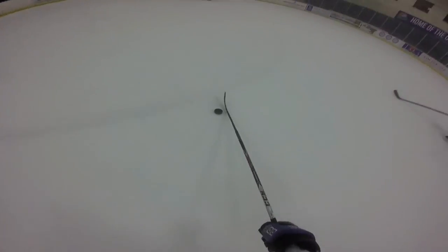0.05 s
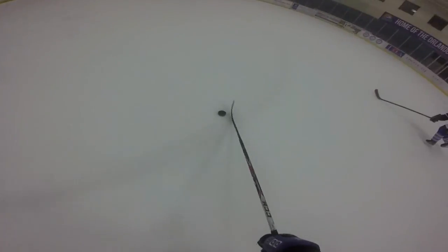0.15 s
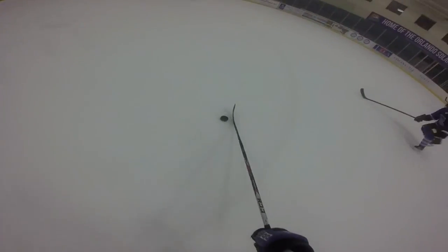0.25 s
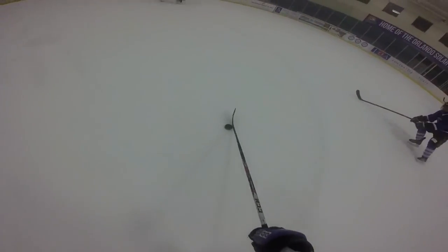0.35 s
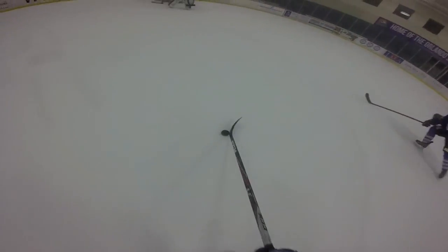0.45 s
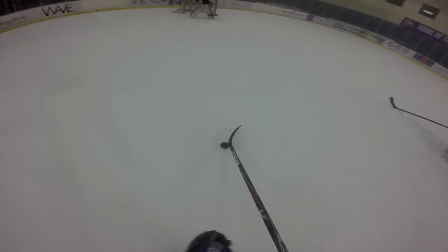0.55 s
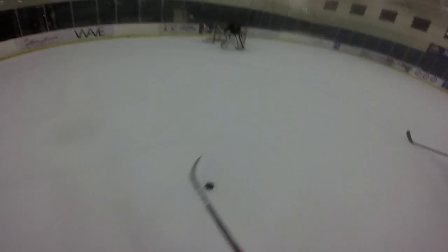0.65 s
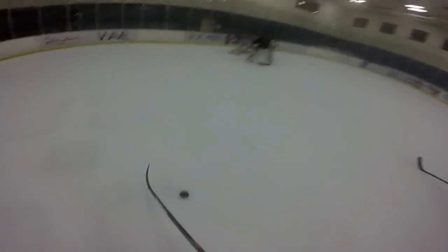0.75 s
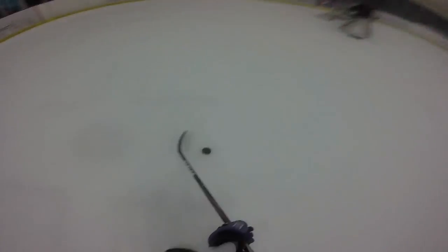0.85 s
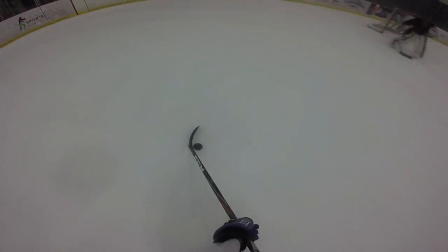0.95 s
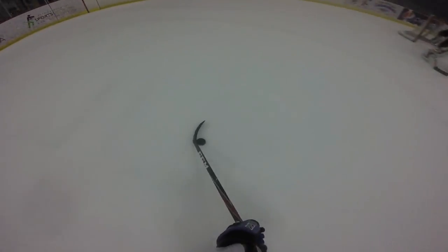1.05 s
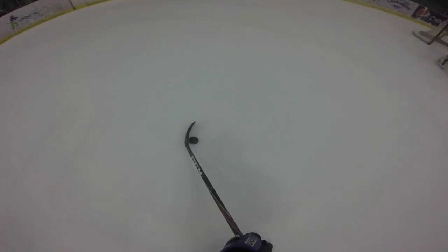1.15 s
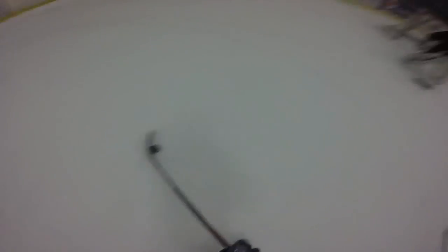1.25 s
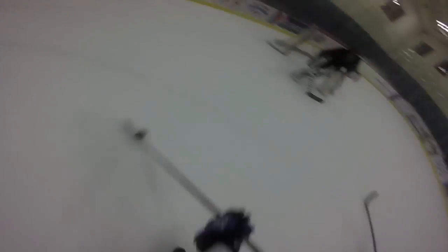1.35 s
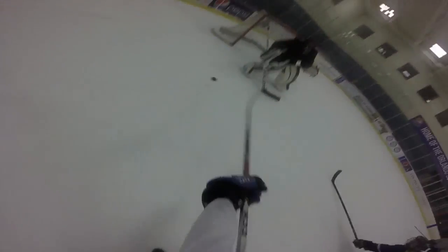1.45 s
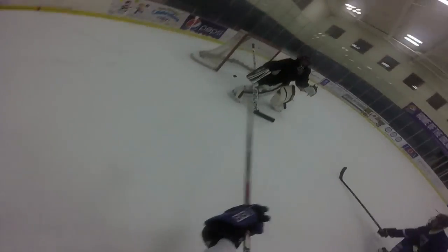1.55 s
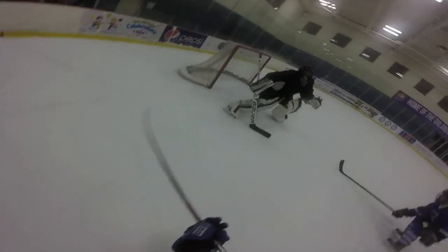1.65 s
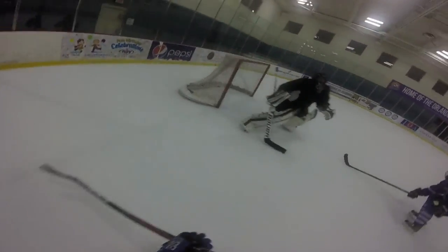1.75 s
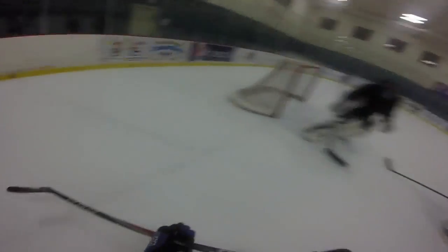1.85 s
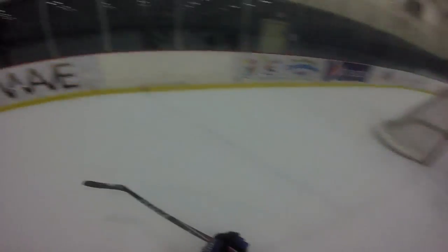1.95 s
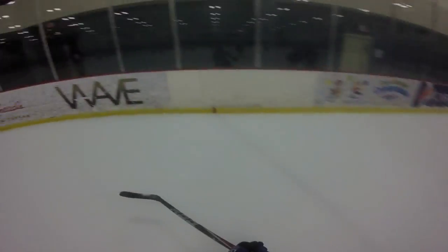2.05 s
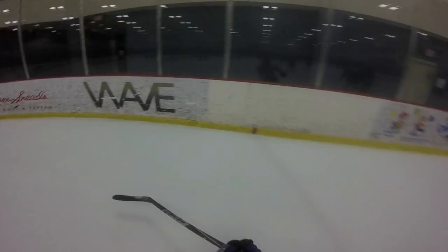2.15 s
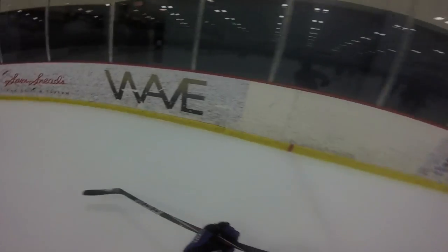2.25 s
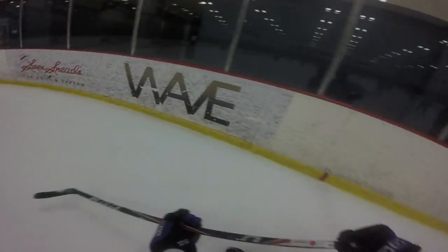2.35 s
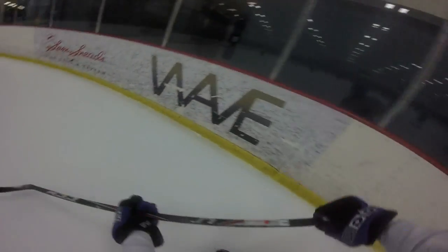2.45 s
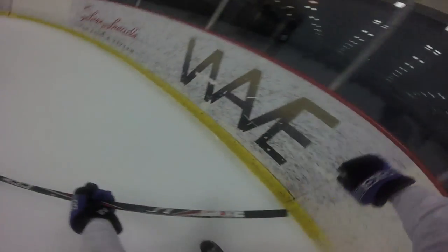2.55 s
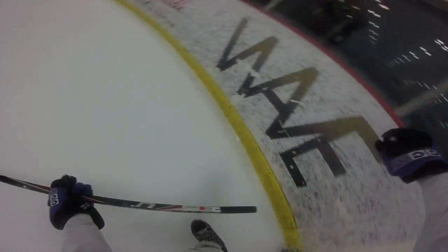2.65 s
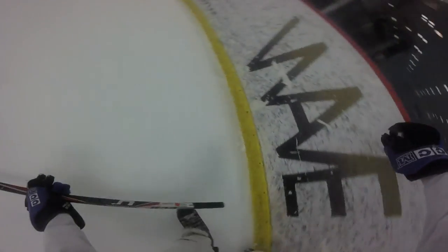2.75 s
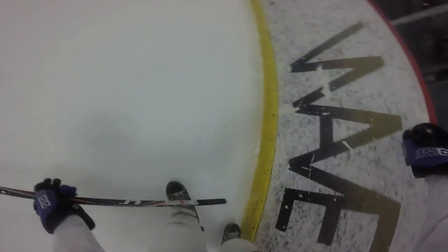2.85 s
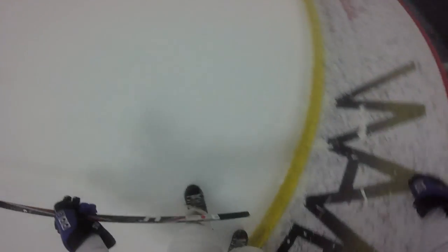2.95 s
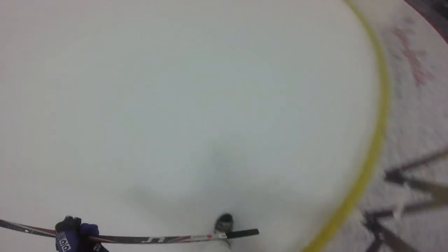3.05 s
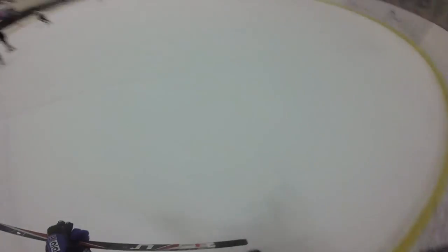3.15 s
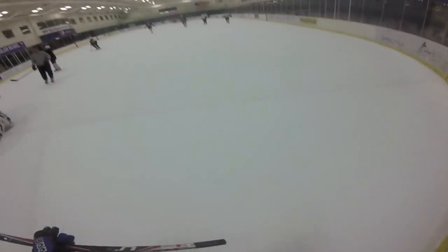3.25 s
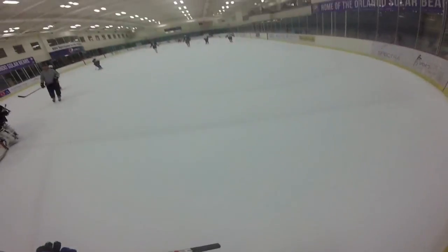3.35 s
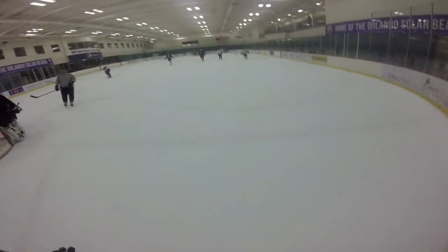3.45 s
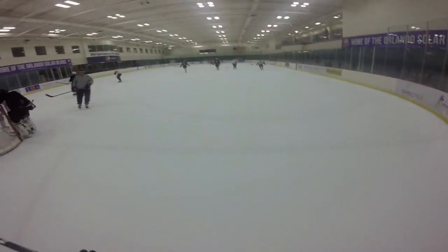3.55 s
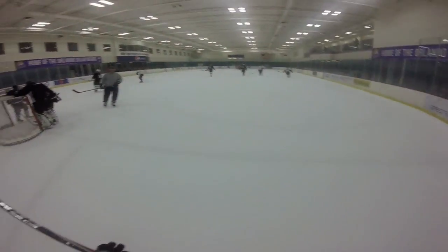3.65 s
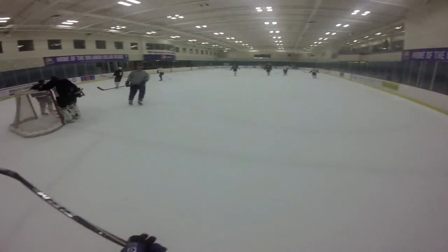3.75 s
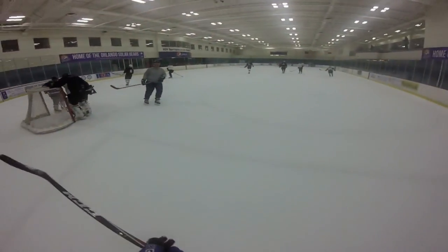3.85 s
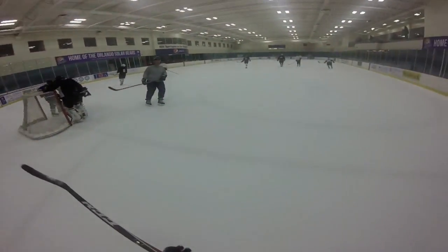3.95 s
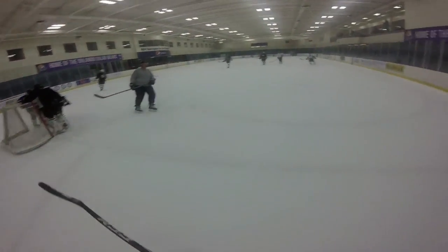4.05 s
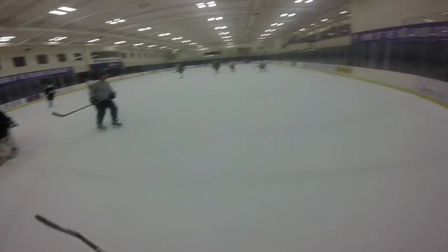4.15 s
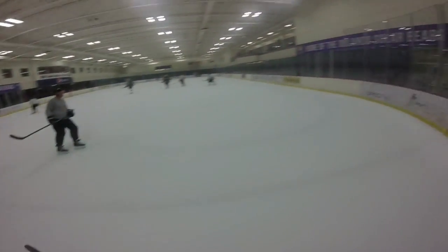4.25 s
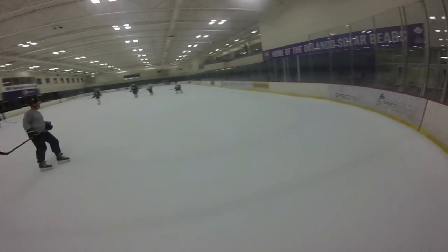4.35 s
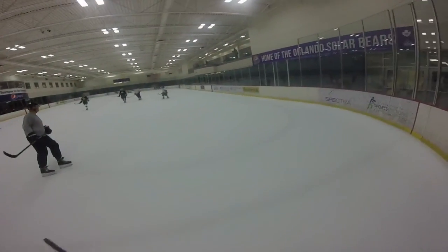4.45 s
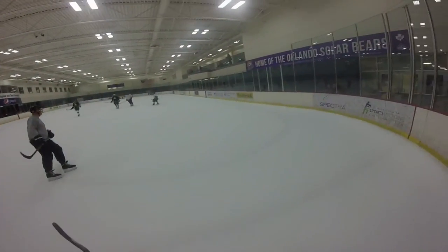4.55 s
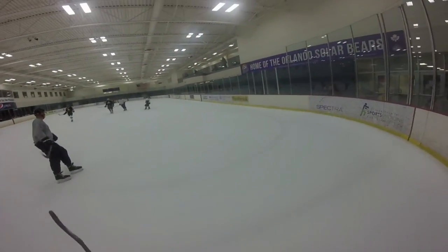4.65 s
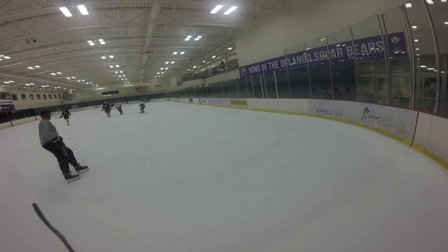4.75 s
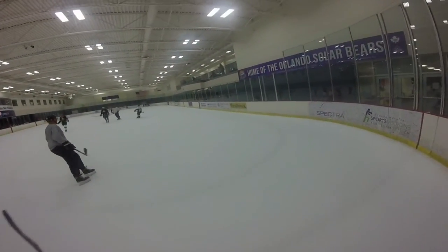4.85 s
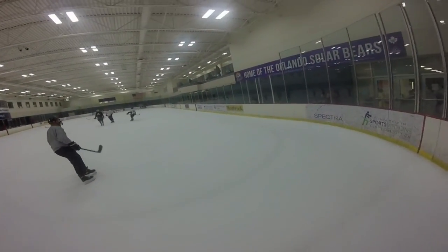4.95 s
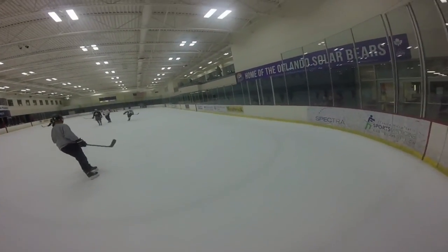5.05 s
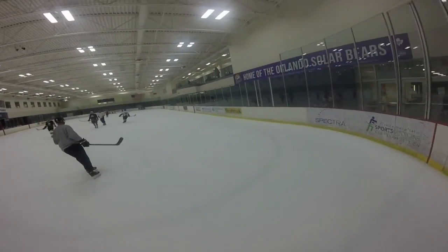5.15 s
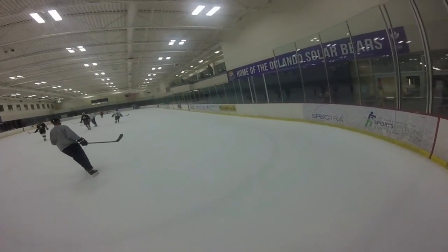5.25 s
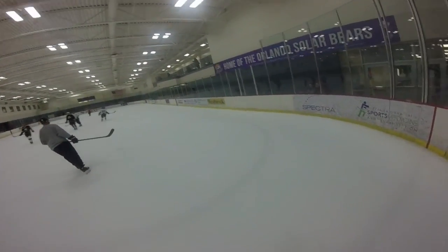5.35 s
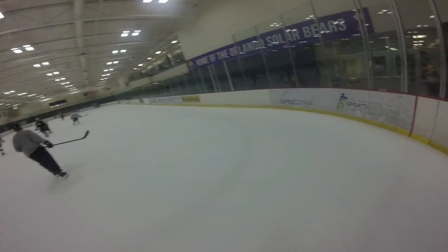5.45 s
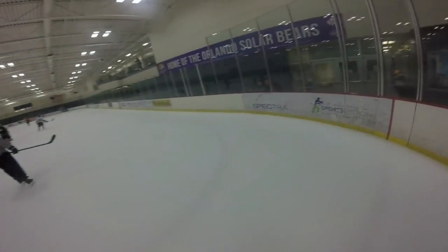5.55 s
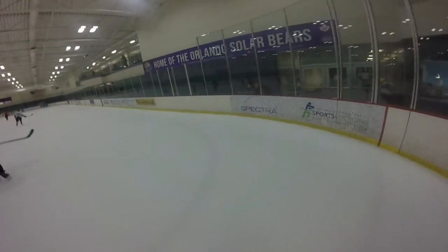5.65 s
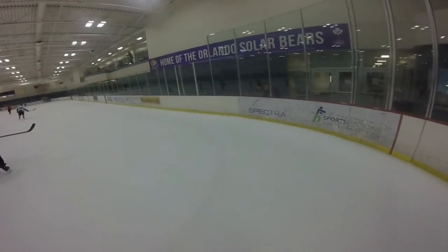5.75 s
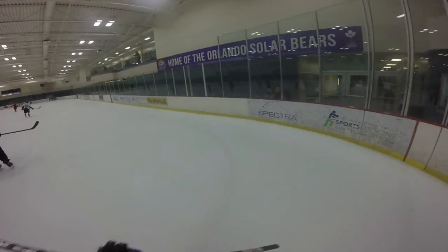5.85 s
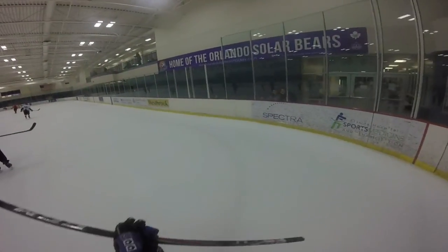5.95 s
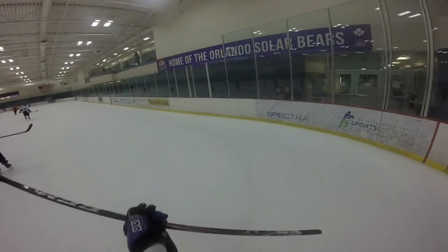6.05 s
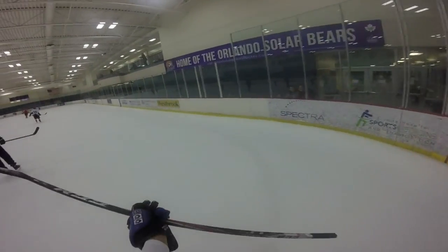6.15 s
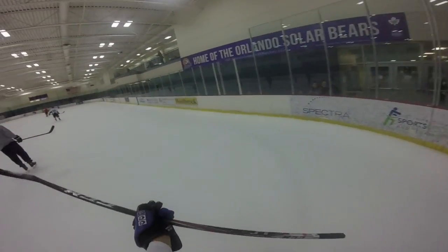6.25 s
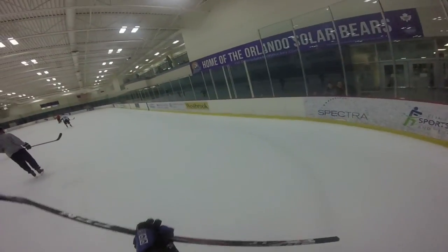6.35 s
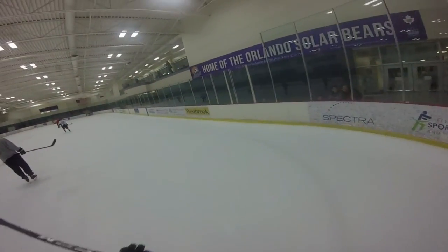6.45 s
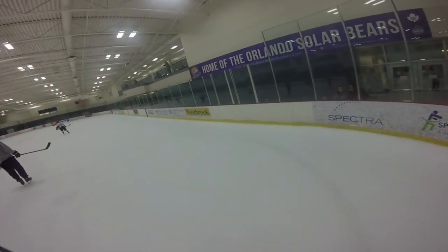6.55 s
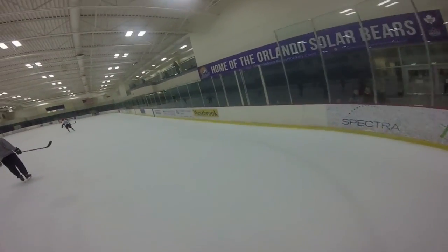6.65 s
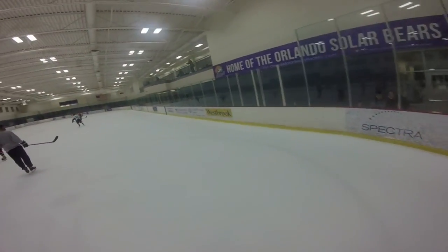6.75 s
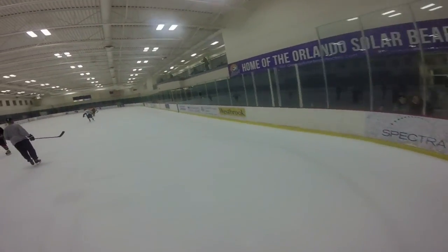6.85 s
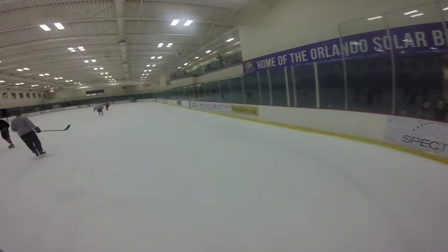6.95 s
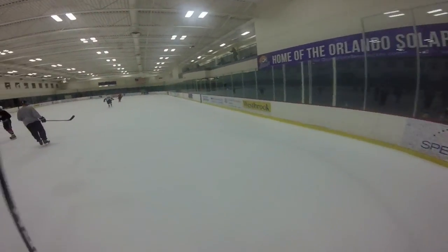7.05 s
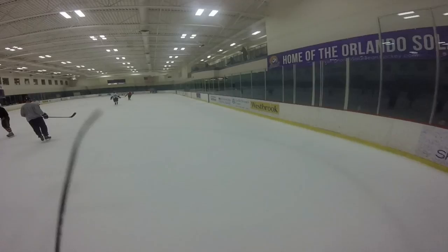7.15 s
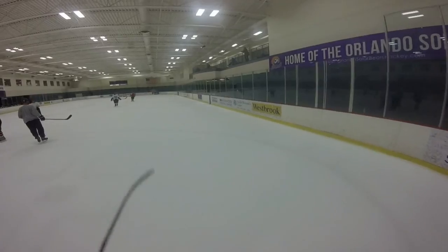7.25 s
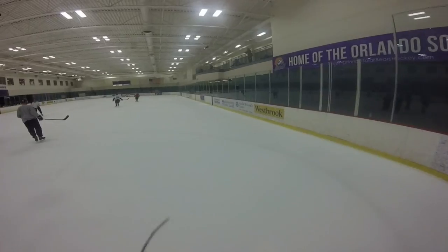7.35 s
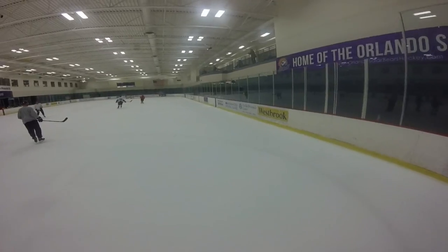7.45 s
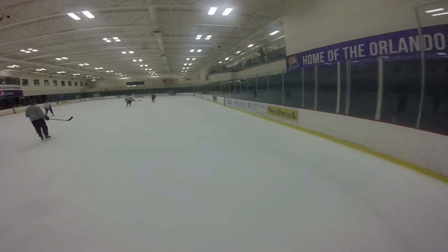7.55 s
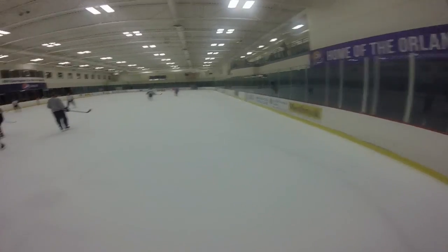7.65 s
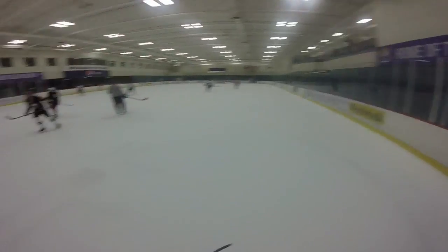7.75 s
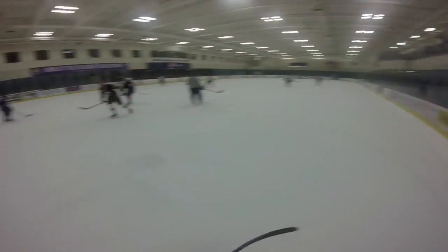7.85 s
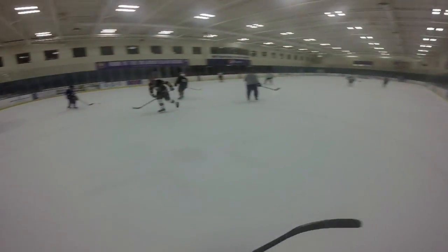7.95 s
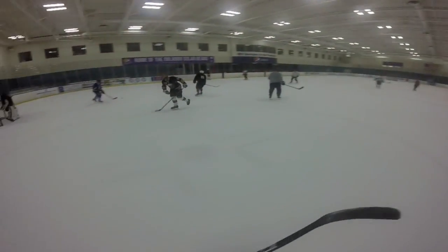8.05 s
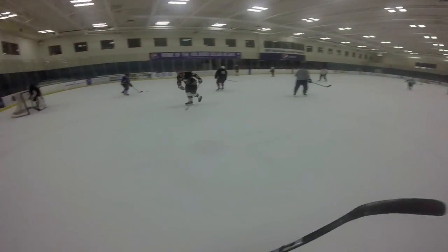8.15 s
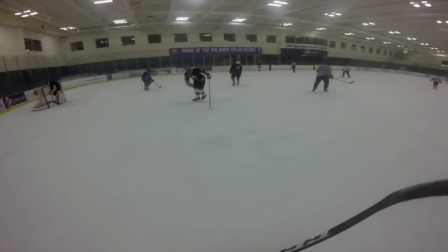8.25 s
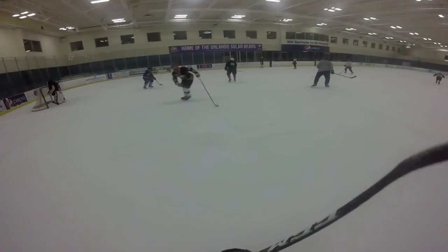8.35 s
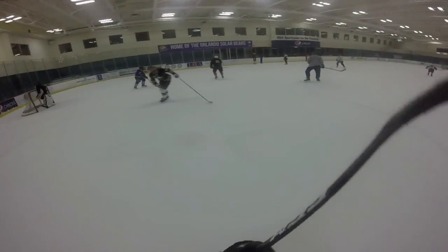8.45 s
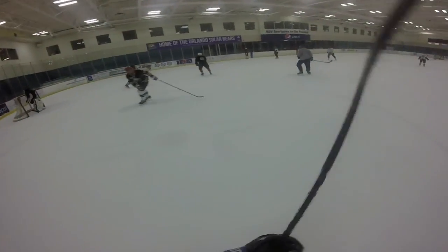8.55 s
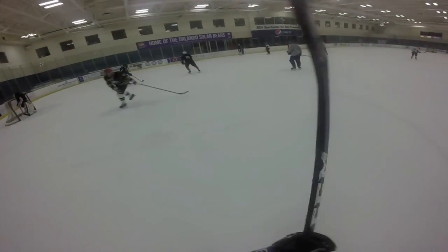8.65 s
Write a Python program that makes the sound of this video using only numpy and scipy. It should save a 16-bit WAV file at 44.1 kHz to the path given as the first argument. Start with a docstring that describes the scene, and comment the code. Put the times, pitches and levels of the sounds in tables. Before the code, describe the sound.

In a reverberant indoor rink, a helmet microphone in a hollow plastic case picks up a steady, slightly fluttering hall wash. From 0 to 1.8 s, skate blades make short gritty strokes over deep rumble, with low thumps and dry plastic ticks; a sharp stick-on-puck clack at 0.94 s rings into the hall, with smaller knocks after it. Thumps and crunches cluster at 1.2-1.5 s. From 1.9 s edges scrape sideways, swelling to harshest around 2.4-2.8 s, with snow-spray hiss, a brief rough squeal near 2.3 s and the heaviest double thud at 2.72 s beside a clack and hard tick. The scrape falls away by 3.5 s. A quiet glide follows: dull thumps around 3.8-4.1 s, a clack at 4.9 s, then fainter knocks and bumps. Soft strokes return at 7.1 and 7.9 s, with a clack at 7.4, a crunchy thump at 7.5 and closing thumps after 8.5 s.

```python
"""A hockey player skates, brakes hard and glides on, heard from a cased helmet camera over the wash of a hall.
First come blade strokes, body rumble, low thumps, plastic ticks and clacks of sticks on the puck.
From 1.9 s the edges scrape in a long sideways stop, with snow spray, narrow bands of noise and the hardest thumps.
Then a quiet glide with sparse thumps and clacks; from 7 s two more strokes and more thumps.
Sources are filtered noise and dying modes; hall and blades also take the resonances of the case."""
import sys
import numpy as np
from scipy import signal
from scipy.fft import rfft, irfft
from scipy.io import wavfile
from scipy.ndimage import uniform_filter1d

SR = 44100
rng = np.random.default_rng(int(sys.argv[2]) if len(sys.argv) > 2 else 0)


def inscribe(sig):
    """Save sig as 16-bit PCM at rate SR to the path in sys.argv[1].

    A 1-D sig is mono; a 2-D sig holds one channel per row.
    Samples are clipped to [-1, 1] before scaling.
    """
    pcm = np.round(np.clip(np.atleast_2d(sig).T, -1, 1) * 32767)
    wavfile.write(sys.argv[1], SR, pcm.astype(np.int16))


N = 384552
TIME = np.arange(N) / SR
HZ = np.fft.rfftfreq(N, 1 / SR)

# sideways stop into the boards: [t/s, scrape level before trim/dB]
STOP = [(1.9, -51.5), (2.11, -41), (2.24, -38.5), (2.42, -34.5), (2.62, -36), (2.78, -36), (2.92, -46.5),
        (3.35, -54), (3.7, -87)]


def amp(db):
    """Decibels to gain."""
    return 10 ** (np.asarray(db) / 20)


def read(points, hz):
    """Interpolates a spectrum on a log-frequency axis."""
    f, value = np.transpose(points)
    return np.interp(np.log(hz + 1), np.log(f), value)


def add(mix, start_s, sound):
    """Mixes a sound in at start_s."""
    part = mix[max(round(start_s * SR), 0):][:len(sound)]
    part += sound[:len(part)]


def colour(x, db):
    """Filters x by a dB gain per frequency bin."""
    return irfft(rfft(x) * amp(db), N)


def unit(x, lo_hz=0, hi_hz=SR):
    """Scales x to rms 1 within a band."""
    in_band = (HZ >= lo_hz) & (HZ <= hi_hz)
    return x / np.std(irfft(rfft(x) * in_band, N))


def wander(corner_hz):
    """Slow random signal of rms 1: noise under a Gaussian low-pass."""
    lowpass = np.exp(-(HZ / corner_hz) ** 2)
    return unit(irfft(rfft(rng.standard_normal(N)) * lowpass, N))


def patchy(x, depth_db, span_s=0.039, span_hz=500):
    """Lets small patches of time and frequency swell and fade independently."""
    hz, t, z = signal.stft(x, SR, nperseg=512, noverlap=384)
    bins, frames = max(round(span_hz / hz[1]), 1), max(round(span_s / t[1]), 1)
    field = uniform_filter1d(rng.standard_normal(z.shape), bins, axis=0)
    field = uniform_filter1d(field, frames, axis=1)
    gain = amp(depth_db * field / field.std())
    return signal.istft(z * gain, SR, nperseg=512, noverlap=384)[1][:N]


def ring(modes, t, spread, scatter_db):
    """Exponentially dying modes, pitch and level scattered anew at each blow."""
    chance = rng.standard_normal((len(modes), 2))
    out = 0
    for (hz, db, t60), (level_chance, pitch_chance) in zip(modes, chance):
        decay = amp(db + scatter_db * level_chance - 60 * t / t60)
        out = out + decay * np.sin(2 * np.pi * hz * (1 + spread * pitch_chance) * t)
    return out


def case_db():
    """Lift of the hollow plastic case: a sum of Gaussian resonances in dB."""
    # case resonances: [f/Hz, width between 1-sigma points/Hz, lift/dB]
    resonances = [(1614, 460, 9.5), (2066, 203, 7.5), (2527, 256, 12), (2760, 85, 8), (3374, 360, 6.5),
                  (4930, 210, 4), (6290, 750, 14), (7570, 490, 6.5), (8800, 1200, 0)]
    return sum(db * np.exp(-2 * ((HZ - hz) / width) ** 2) for hz, width, db in resonances)


def hall(case_share=0.65, flutter_db=1.05, trim_db=-1.92, hiss_db=-80):
    """Distant skates and ventilation, blurred by the arena, as fluttering noise over a steady faint hiss."""
    # wash level: [t/s, level before trim/dB]
    wash_levels = [(0, -44), (.6, -42), (1.2, -43.5), (2.5, -44.5), (3.0, -41), (3.9, -48), (4.6, -50.5),
                   (6.1, -51.5), (6.75, -55), (7.3, -49.5), (8.0, -48), (8.5, -50.5)]
    # wash density before the case: [f/Hz, relative density/dB per Hz]
    wash_spectrum = [(120, -29), (250, -8.5), (600, -16), (850, -13.5), (1100, -9.5), (1480, 0),
                     (1850, -13), (2550, -13.5), (3000, -17.5), (3470, -15.5), (4300, -31), (6200, -37.5),
                     (9000, -41), (15000, -50)]
    # hiss density: [f/Hz, relative density/dB per Hz]
    hiss_spectrum = [(100, 1), (300, -4.5), (700, -9.5), (2000, -15.5), (5000, -23), (9000, -31.5),
                     (15000, -42)]
    wash = patchy(rng.standard_normal(N), depth_db=0.56) * amp(flutter_db * wander(23))
    wash = unit(colour(wash, read(wash_spectrum, HZ) + case_share * case_db()), 1200, 1800)
    hiss = unit(colour(rng.standard_normal(N), read(hiss_spectrum, HZ)), 8000, 15000)
    level_db = np.interp(TIME, *np.transpose(wash_levels)) + trim_db
    return wash * amp(level_db) + amp(hiss_db) * hiss


def arena(x, rise_s=0.058):
    """Long diffuse tail: noise with a decay time per frequency, convolved with x."""
    # reverberation: [f/Hz, t60/s]
    decay_times = [(200, 2), (1500, 1.8), (4000, 1.9), (10000, 1.9)]
    hz, t, z = signal.stft(rng.standard_normal(2 * SR), SR, nperseg=256)
    decay = amp(-60 * t / read(decay_times, hz)[:, None])
    tail = signal.istft(z * decay * np.minimum(t / rise_s, 1), SR, nperseg=256)[1]
    return signal.fftconvolve(x, tail / np.linalg.norm(tail))[:N]


def ticks(snap_db=3.0, snap_t60=0.012, rise_s=0.00055):
    """Helmet fittings: hard plastic snaps on plastic at the case, as modes plus a noise snap."""
    # ticks: [t/s, peak/dB, gain of the top treble before peak scaling/dB]
    tick_events = [(0.1343, -38.5, -15), (.739, -41, -20), (0.824, -40, -20), (0.8845, -31, -18),
                   (0.9755, -31, 0), (1.3436, -28.5, 0), (1.4476, -37, -8), (1.5226, -29, -3),
                   (1.8464, -37, -21), (1.8774, -28, -15), (2.15, -34.5, -8), (2.6537, -31.5, -3),
                   (2.7603, -22, -12), (3.225, -40, -15), (3.3143, -37.5, -5), (3.3813, -42, -14)]
    # tick modes: [nominal f/Hz, relative level/dB, t60/s]
    modes = [(3840, 6, 0.023), (5320, 7, 0.015), (5720, 8, 0.018), (7120, -2.5, 0.022), (8700, 6, 0.012),
             (9400, -9, 0.032), (11600, -57, 0.0083)]
    out, t = np.zeros(N), np.arange(SR // 20) / SR
    treble = signal.butter(3, [3800, 12000], "bandpass", fs=SR, output="sos")
    lower = signal.butter(3, 7500, fs=SR, output="sos")
    for s, peak_db, top_db in tick_events:
        snap = signal.sosfilt(treble, rng.standard_normal(len(t))) * amp(snap_db - 60 * t / snap_t60)
        tick = ring(modes, t, spread=.02, scatter_db=2) / 2 + snap
        dull = signal.sosfiltfilt(lower, tick)
        tick = (dull + amp(top_db) * (tick - dull)) * (1 - np.exp(-t / rise_s))
        add(out, s, amp(peak_db) * tick / abs(tick).max())
    return out


def clacks(rise_s=0.00095, focus_db_per_octave=10.5, crack_db=-12, crack_t60=0.0097, dulling=0.89):
    """Sticks meet the puck: a noise crack and case modes; faint, far ones keep mostly the ring near their pitch."""
    # clacks: [t/s, peak/dB, brightest pitch f/Hz]
    clack_events = [(.9398, -24, 2970), (.9420, -13.5, 1690), (.981, -30, 1600), (1.043, -25, 1700),
                    (1.094, -29.5, 2300), (2.708, -20.5, 2000), (3.305, -33, 1500), (4.919, -26.5, 1300),
                    (4.954, -37, 1400), (5.239, -43, 2100), (5.505, -45, 1500), (5.697, -41, 2100),
                    (7.376, -28.5, 1400)]
    # clack modes: [nominal f/Hz, level before focus/dB, t60/s]
    clack_modes = [(1500, -5.5, 0.031), (1610, -3, 0.014), (2120, -13, 0.026), (2810, -0.5, .015),
                   (3470, -2.5, 0.019), (4070, -8, 0.018), (6420, -1, 0.013), (7460, -6, 0.0095)]
    out, t = np.zeros(N), np.arange(SR // 15) / SR
    middle = signal.butter(2, [1400, 5500], "bandpass", fs=SR, output="sos")
    nearest_db = max(db for s, db, pitch in clack_events)
    for s, peak_db, pitch in clack_events:
        loss_db = dulling * (nearest_db - peak_db)
        slope_db = focus_db_per_octave + loss_db
        modes = [(hz, db - slope_db * abs(np.log2(hz / pitch)), t60) for hz, db, t60 in clack_modes]
        tone = ring(modes, t, spread=.01, scatter_db=1)
        crack = signal.sosfilt(middle, rng.standard_normal(len(t)))
        crack = crack * amp(crack_db - loss_db - 60 * t / crack_t60)
        clack = (tone / abs(tone).max() + crack) * (1 - np.exp(-t / rise_s)) ** 2
        add(out, s, amp(peak_db) * clack / abs(clack).max())
    return out


def thumps(sag=0.61, sag_s=0.01, peak_cycles=1.36, crunch_t60=0.051, rise_s=0.0074):
    """Low thumps, jolts of the helmet and at 2.3 s chatter of the braking edges: sagging cycles, crunch, ring."""
    # thumps: [t/s, low cycles' level/dB, starting pitch f/Hz, crunch re low cycles' level/dB]
    thump_events = [(0.556, -22.5, 80, -40), (0.953, -31, 155, -6), (1.224, -25.5, 190, -11.5),
                    (1.278, -22.5, 75, -40), (1.344, -25, 223, -6), (1.357, -23, 148, -6.5),
                    (1.427, -22, 233, -0.5), (1.445, -29, 175, -14), (1.508, -22.5, 162, -11),
                    (1.948, -19, 213, -25), (2.315, -24, 145, -38), (2.367, -20, 116, -40),
                    (2.451, -23.5, 69, -38), (2.716, -9.5, 137, -31), (2.735, -11, 141, -29),
                    (3.035, -30.5, 197, -30), (3.33, -34, 170, -32), (3.828, -22, 283, -14),
                    (3.965, -27, 227, -13), (4.071, -21, 219, -18), (4.889, -25.5, 195, -21),
                    (5.034, -31.5, 198, -30), (5.304, -29, 197, -30), (5.367, -30, 200, -30),
                    (5.799, -31.5, 197, -35), (6.561, -32.5, 181, -20), (7.465, -31, 171, -10),
                    (7.542, -24, 343, -4), (7.913, -37, 205, -30), (7.990, -32, 171, -25),
                    (8.527, -21, 228, -15.5), (8.552, -33, 131, -3), (8.632, -23, 226, -14)]
    # helmet and mount modes: [nominal f/Hz, level re low cycles' level/dB, t60/s]
    modes = [(47.6, -18.5, 0.18), (95.3, -6.5, 0.16), (121.9, -6.5, 0.23), (307, -12, 0.056),
             (440, -14, 0.032)]
    # crunch density: [f/Hz, relative density/dB per Hz]
    crunch_spectrum = [(80, -10), (200, 4.5), (320, 2.5), (500, -4.5), (750, -20.5), (1050, -11.5),
                       (1800, -15), (3500, -42), (8000, -90)]
    out, t = np.zeros(N), np.arange(SR // 3) / SR
    crunch_gain = amp(read(crunch_spectrum, np.fft.rfftfreq(len(t), 1 / SR)))
    crunch_gain /= np.sqrt(np.mean(crunch_gain ** 2))
    edges = signal.windows.tukey(len(t), .006)
    for s, db, hz, crunch_db in thump_events:
        turns = np.cumsum(hz * (1 - sag * (1 - np.exp(-t / sag_s)))) / SR
        u = t * hz / peak_cycles  # envelope peaks at u = 1
        low_cycles = (u * np.exp(1 - u)) ** 2 * np.sin(2 * np.pi * turns)
        after = ring(modes, t, spread=0.052, scatter_db=1.0) * (1 - np.exp(-t / rise_s))
        grit = irfft(rfft(rng.standard_normal(len(t))) * crunch_gain, len(t))
        crunch = grit * amp(crunch_db - 60 * t / crunch_t60)
        add(out, s, amp(db) * edges * (low_cycles + after + crunch))
    return out


def braking(fade_s=0.13):
    """How hard the edges scrape during the stop, 1 at the hardest."""
    s, db = np.transpose(STOP)
    contact = np.clip(np.minimum(TIME - s[0], s[-1] - TIME) / fade_s, 0, 1)
    return contact * amp(np.interp(TIME, s, db) - db.max())


def body(sway_trim_db=0.5, ruts_db=2.0, chatter_db=-42.5, chatter_power=0.83,
         stride_chatter_db=-14.5, judder_db=-33.5, judder_power=1.48):
    """Rumble of blades on uneven ice, carried up by the skeleton: follows effort, strides and the stop."""
    # rolling rumble: [t/s, sway level before trim/dB]
    effort = [(0, -39.5), (2.8, -38.5), (3.4, -55.5), (5.5, -53), (7.5, -54), (8.72, -48.5)]
    # weight shifts onto one skate: [peak t/s, length between 1-sigma points/s, sway before trim/dB]
    shifts = [(0.18, 0.11, -38.5), (0.61, 0.073, -34), (.75, 0.047, -35), (1.323, .09, -25),
              (1.453, 0.2, -27.5), (1.876, 0.058, -29.5), (2.03, 0.043, -40), (2.474, 0.072, -26),
              (2.8, 0.12, -28.5), (3.09, 0.11, -38.5), (3.997, 0.13, -43), (4.32, 0.036, -42.5),
              (4.946, 0.38, -52), (5.77, 0.15, -42), (6.027, 0.23, -40), (6.6, .13, -41.5),
              (6.877, 0.068, -45), (7.54, 0.052, -35.5), (8.013, 0.075, -44), (8.334, .1, -44),
              (8.62, .18, -38.5)]
    # sway density: [f/Hz, relative density/dB per Hz]
    sway_spectrum = [(12, 0), (25, 1.5), (45, 7.5), (60, 0.5), (85, -15.5), (160, -45), (600, -70),
                     (2000, -110)]
    # chatter density: [f/Hz, relative density/dB per Hz]
    chatter_spectrum = [(45, -2), (75, -2), (105, 6), (150, -8), (220, -16), (400, -25.5), (900, -29),
                        (3000, -103)]
    s, db = np.transpose(effort)
    effort_db = np.interp(TIME, s, db)
    strides = sum(amp(peak_db) * np.exp(-2 * ((TIME - at) / length) ** 2) for at, length, peak_db in shifts)
    sway = np.hypot(amp(effort_db), strides)
    rolling = amp(chatter_db + chatter_power * (effort_db - db.max()))
    judder = amp(judder_db) * braking() ** judder_power  # edges in the stop, felt through the legs
    chatter = np.linalg.norm([rolling, amp(stride_chatter_db) * strides, judder], axis=0)
    low = unit(colour(rng.standard_normal(N), read(sway_spectrum, HZ)))
    high = unit(colour(rng.standard_normal(N), read(chatter_spectrum, HZ)))
    low = low / np.sqrt(uniform_filter1d(low ** 2, size=SR // 5))  # even strength within a stride
    bumps = amp(ruts_db * wander(9))  # ruts in the ice shake both together
    return bumps * (amp(sway_trim_db) * low * sway + high * chatter)


def narrow_bands():
    """Narrow bands of noise swell and fade: short squeals and softer, broader hisses, through a doubled pole."""
    # bands: [centre t/s, full width at 1/e/s, f/Hz, width of each pole/Hz, rms before envelope/dB]
    band_events = [(.40, .29, 8100, 1200, -85), (1.379, 0.018, 2800, 490, -43),
                   (1.395, .016, 3400, 500, -40.5), (1.774, 0.21, 7600, 1200, -66),
                   (2.322, .11, 2080, 220, -40.5), (2.483, 0.23, 6250, 600, -49),
                   (7.3, 0.5, 3420, 600, -59), (7.55, .6, 6160, 600, -75)]
    out = np.zeros(N)
    for s, length, hz, width, db in band_events:
        t = np.arange(-length, length, 1 / SR)
        pole = np.exp(-np.pi * width / SR + 2j * np.pi * hz / SR)
        band = signal.lfilter([1], np.poly([pole, pole]), rng.standard_normal(len(t))).real
        add(out, s - length, band / band.std() * amp(db) * np.exp(-(2 * t / length) ** 2))
    return out


def stroke(start_s, length_s, t60, bite_share=.35):
    """An edge bites over a share of its stroke, holds, and dies away once it lifts."""
    bite = np.clip((TIME - start_s) / (bite_share * length_s), 0, 1)
    return bite * amp(-60 * np.maximum(TIME - start_s - length_s, 0) / t60)


def blades(flutter_db=1.04, chips_per_s=600, chip_db=12, scrape_trim_db=-1.5, spray_db=-46, spray_power=1.82,
           scrape_t60=2.07, spray_t60=1.34):
    """Steel shaves the ice: juddering noise with chips breaking off, split into low scrape and high snow spray."""
    # single strokes: [start t/s, length/s, scrape level before trim/dB, snow spray level/dB]
    skate_strokes = [(0, 0.084, -50, -66.5), (.3, .25, -56, -69.5), (0.618, 0.57, -53.5, -72),
                     (1.02, 0.42, -49, -67), (1.282, 0.17, -45.5, -57.5), (1.686, 0.21, -45.5, -62),
                     (7.066, 0.4, -50, -70), (7.92, .2, -59.5, -86)]
    # blade density before the case: [f/Hz, relative density/dB per Hz]
    blade_spectrum = [(200, -47), (550, -14), (800, -4.5), (1300, -0.5), (2600, -3.5), (3700, -3),
                      (4500, -12), (6500, -17), (9000, -14), (10500, -24.5), (13500, -29), (15000, -44)]
    chips = (rng.random(N) < chips_per_s / SR) * rng.standard_normal(N)
    shave = (rng.standard_normal(N) + amp(chip_db) * chips) * amp(flutter_db * wander(79))
    shave = patchy(shave, depth_db=1.6, span_s=.035)
    shave = colour(shave, read(blade_spectrum, HZ) + case_db())
    scrape = irfft(rfft(shave) / (1 + (HZ / 4700) ** 10), N)
    spray = unit(shave - scrape, 5500, 12000)
    scrape = unit(scrape, 1900, 4200)
    brake = braking()
    # powers of the stop and the strokes add up
    scrape_power = (amp(max(db for s, db in STOP)) * brake) ** 2
    snow_power = (amp(spray_db) * brake ** spray_power) ** 2
    for start, length, db, snow_db in skate_strokes:
        scrape_power += (amp(db) * stroke(start, length, scrape_t60)) ** 2
        snow_power += (amp(snow_db) * stroke(start, length, spray_t60)) ** 2
    return amp(scrape_trim_db) * scrape * np.sqrt(scrape_power) + spray * np.sqrt(snow_power)


def scene():
    """Airborne and body-borne sound meet at one microphone; only the clacks excite the arena tail."""
    sticks = clacks()
    echo = amp(-12.5) * arena(sticks)
    return (hall() + blades() + narrow_bands() + body() + thumps() + ticks() + sticks + echo)[None]


def record(dry, edge_hz=15150):
    """Band limit of the camera: a linear-phase low-pass."""
    lowpass = signal.firwin(511, edge_hz, window=("kaiser", 9), fs=SR)
    return signal.oaconvolve(dry, lowpass[None], "same")


dry = scene()
out = record(dry)
inscribe(out)
```